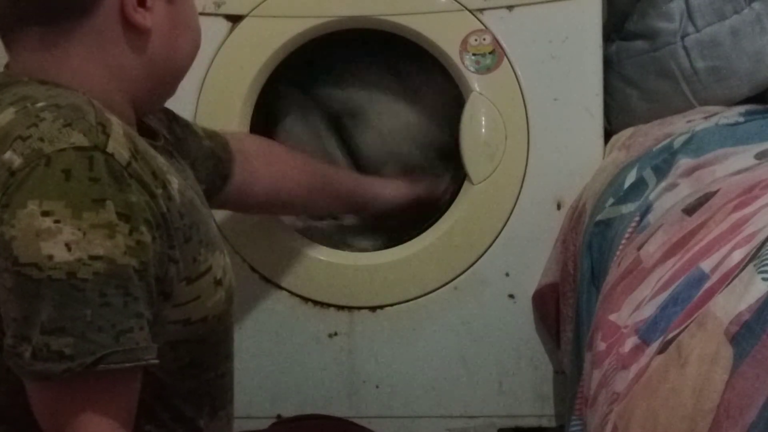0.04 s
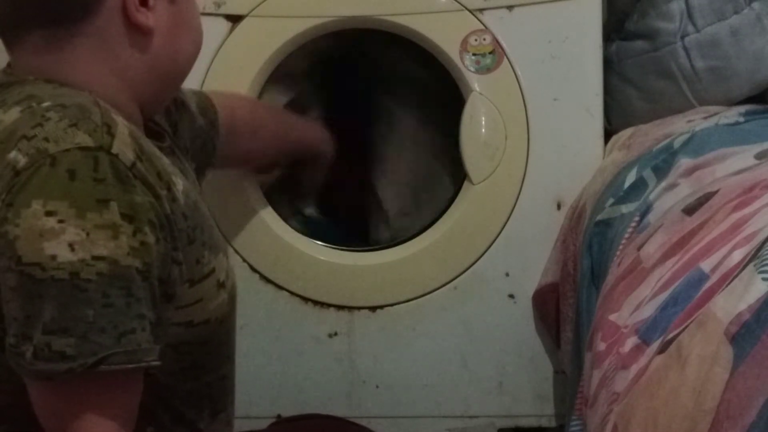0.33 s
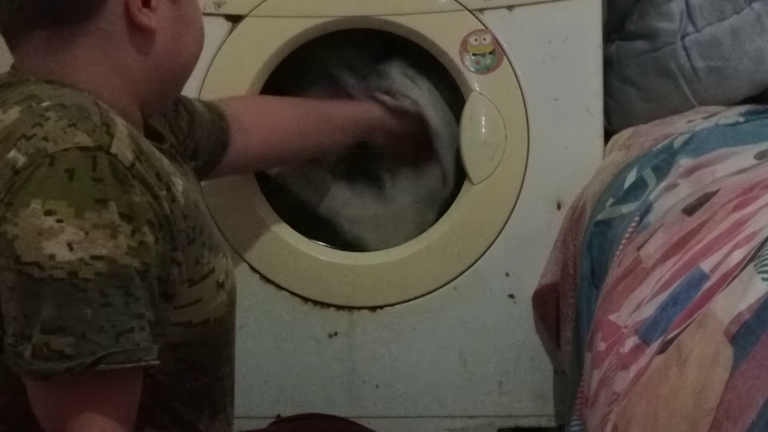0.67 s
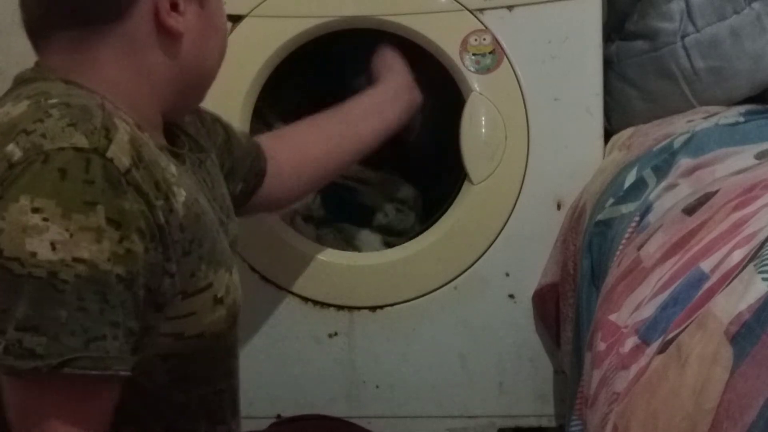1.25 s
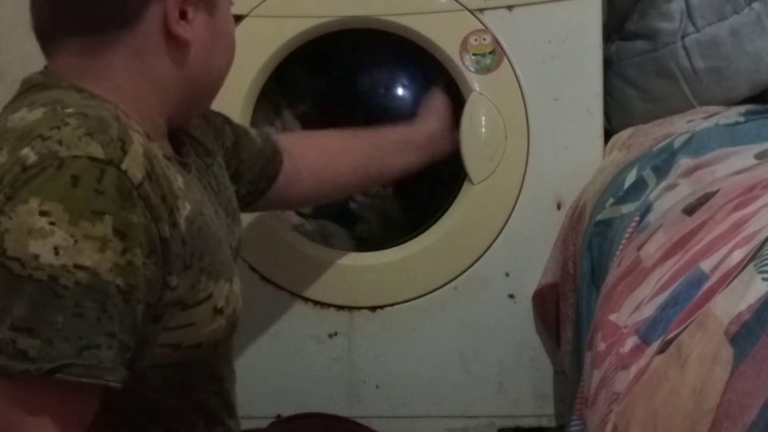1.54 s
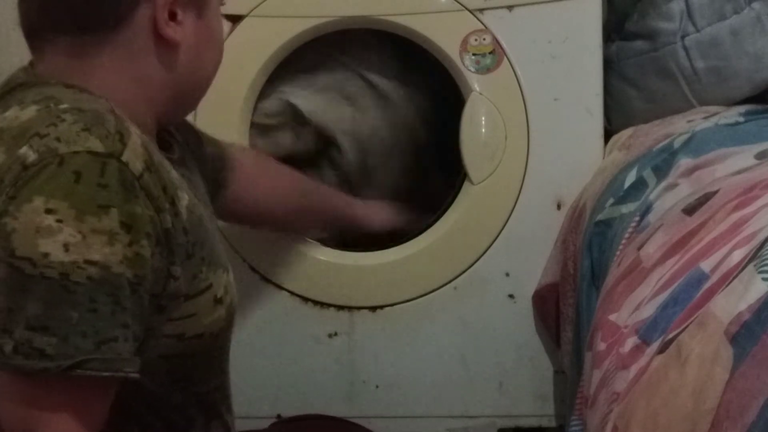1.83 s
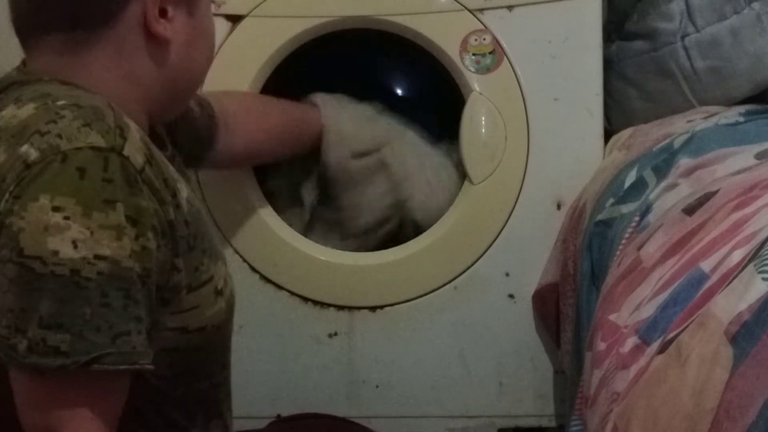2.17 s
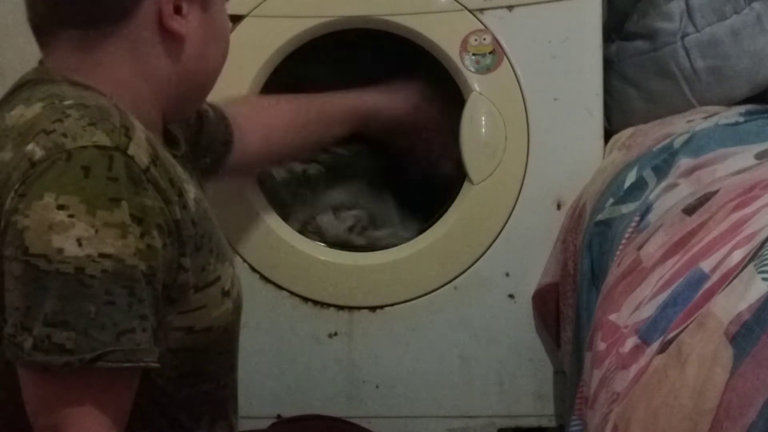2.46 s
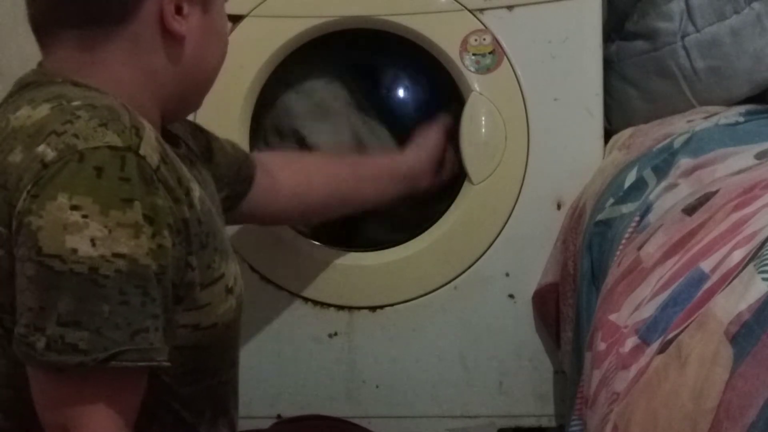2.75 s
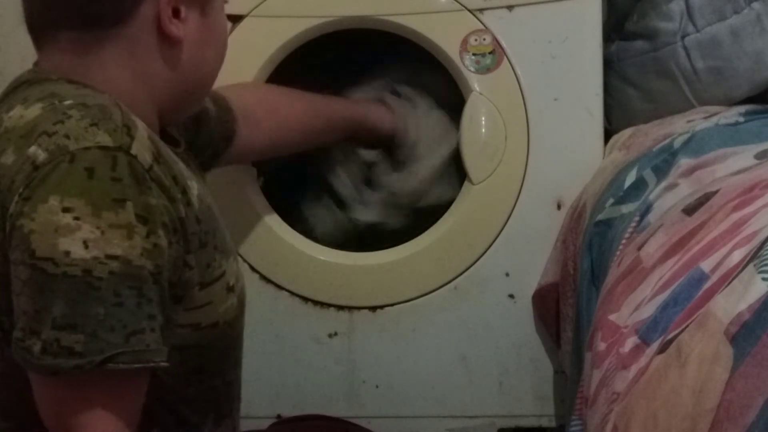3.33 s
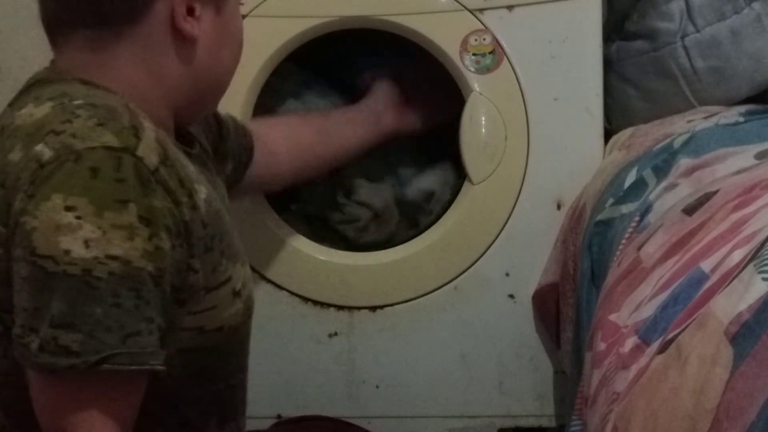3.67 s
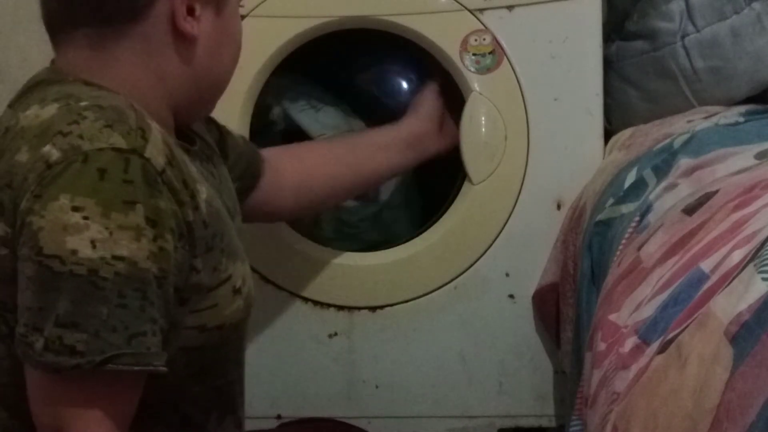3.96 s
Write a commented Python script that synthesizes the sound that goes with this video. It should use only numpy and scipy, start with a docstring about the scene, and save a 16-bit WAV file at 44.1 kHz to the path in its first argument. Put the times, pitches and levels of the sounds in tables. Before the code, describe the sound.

Laundry rustles and thumps as it is turned by hand in a washing machine drum.

```python
"""In a quiet room, an arm turns laundry over in the steel drum of a front-loading washing machine.
The rocking drum rumbles in its tub. Cloth rubs and swishes along the wall in short strokes,
and bundles thump down. The hand knocks the steel, which rings; there are a few bright scrapes
and one short squeak of skin."""
import sys
import numpy as np
from scipy import signal
from scipy.fft import rfft, irfft, next_fast_len
from scipy.io import wavfile
from scipy.ndimage import uniform_filter1d, map_coordinates

SR = 44100
rng = np.random.default_rng(int(sys.argv[2]) if len(sys.argv) > 2 else 0)


def store_wav(level_fs):
    """Save 16-bit WAV to argv[1]."""
    pcm = np.round(np.clip(np.atleast_2d(level_fs), -1, 1) * 32767)
    wavfile.write(sys.argv[1], SR, pcm.T.astype(np.int16))


N = 176400


def amp(db):
    return 10 ** (np.asarray(db) / 20)

def unit(x):
    return x / np.sqrt(np.mean(x ** 2) + 1e-20)

def along(points, hz):
    """Interpolate (freq_hz, value) points on a log axis."""
    freqs, values = np.transpose(points)
    return np.interp(np.log(hz + 1), np.log(freqs + 1), values)

def level(points):
    """Gain per sample from (time_s, level_db) points."""
    return amp(np.interp(np.arange(N) / SR, *np.transpose(points)))

def wobble(per_s):
    """Smooth random curve, per_s knots a second."""
    return map_coordinates(rng.standard_normal(4096), [np.arange(N) * per_s / SR], mode="wrap")

def coloured(x, spectrum):
    """x shaped by a spectrum; rms 1."""
    return unit(irfft(rfft(x) * amp(along(spectrum, np.fft.rfftfreq(N, 1 / SR))), N))

def grains(per_s):
    """Random impulses; rms 1."""
    return unit((rng.random(N) < per_s / SR) * rng.standard_normal(N))

def lowpass(x, hz, order=2):
    return signal.sosfilt(signal.butter(order, hz, fs=SR, output="sos"), x)

def through(x, response):
    return signal.fftconvolve(x, response)[:N]

def steadied(x, samples):
    """x divided by its running rms."""
    return x / np.sqrt(np.abs(uniform_filter1d(x ** 2, samples)) + 1e-12)

def add(track, start_s, sound):
    part = track[max(round(start_s * SR), 0):][:len(sound)]
    part += sound[:len(part)]

def ring(modes, phase_rad=0):
    """Impulse response of damped modes, alternating in sign; energy 1."""
    t = np.arange(SR // 2) / SR
    hz, db, t60_s = np.transpose(modes)[..., None]
    partials = amp(db - 60 * t / t60_s) * np.sin(2 * np.pi * hz * t + phase_rad)
    response = (-1) ** np.arange(len(hz)) @ partials
    return response / np.linalg.norm(response)

def strike(modes, contact_s, scatter):
    """A push and a short scuffle ring the modes; rms 1 over the first 40 ms."""
    t = np.arange(SR // 8) / SR
    scuffle = rng.standard_normal(len(t)) * np.exp(-t / contact_s)
    force = scatter * scuffle / np.linalg.norm(scuffle) + (t == 0)
    blow = signal.fftconvolve(force, ring(modes))
    return blow / np.std(blow[:SR // 25])


def rolling(modes, wander_db=6, drift_rad=0.96):
    """The rolling load favours one note, then another; its bumps upset their phases."""
    t = np.arange(N) / SR
    notes = np.zeros(N)
    for hz, db, _ in modes:
        gain = amp(db + wander_db * wobble(per_s=13))
        phase = rng.uniform(0, 2 * np.pi) + drift_rad * wobble(per_s=45)
        notes += gain * np.sin(2 * np.pi * hz * t + phase)
    return notes

# hollow drum resonances: pitch_hz, gain_db, t60_s
DRUM_MODES = [(193.4, 2, 0.19), (214.6, 0.5, 0.28), (238.8, 4.5, 0.19), (246.9, 2.5, 0.19),
              (286.2, -2.5, 0.14), (304.7, -3.5, 0.42), (354, -7, 0.14), (401.8, -11, 0.13),
              (435, -17, 0.3), (445.8, -10, 0.6), (479.2, -15, 0.42)]
# envelope of the deep drum modes: time_s, level_db
DEEP_ENVELOPE = [(0.0, -47), (0.03, -41), (0.19, -50), (0.39, -34), (0.48, -38), (0.54, -50), (0.63, -44.5),
                 (0.68, -36.5), (0.79, -48.5), (0.96, -47.5), (1.07, -40.5), (1.22, -46), (1.29, -54),
                 (1.34, -49), (1.56, -56), (1.64, -70.5), (1.7, -79), (1.74, -52.5), (1.93, -43.5),
                 (2.06, -36), (2.14, -49), (2.18, -37), (2.4, -45), (2.58, -42), (2.65, -48.5),
                 (2.89, -53.5), (2.99, -42.5), (3.17, -44.5), (3.4, -37), (3.58, -51), (3.66, -51),
                 (3.73, -67), (3.81, -49), (3.9, -66), (3.93, -41.5), (4.0, -55)]
# envelope of the upper drum modes: time_s, level_db
UPPER_ENVELOPE = [(0.0, -57.5), (0.51, -43), (0.97, -63), (1.07, -45), (1.67, -86.5), (1.9, -49),
                  (2.55, -50.5), (2.75, -66.5), (3.36, -43), (3.74, -78), (4.0, -54.5)]

def drum_rumble(split_hz=270, surge_db=1.85):
    """The load keeps the rocking drum's hollow modes sounding."""
    deep = steadied(rolling([m for m in DRUM_MODES if m[0] < split_hz]), samples=1500)
    upper = steadied(rolling([m for m in DRUM_MODES if m[0] >= split_hz]), samples=1800)
    drum = level(DEEP_ENVELOPE) * amp(-3.5) * deep + level(UPPER_ENVELOPE) * amp(-2) * upper
    return drum * amp(surge_db * wobble(per_s=30))


# bass tub resonances: pitch_hz, gain_db, t60_s
TUB_MODES = [(82, -4.5, 0.17), (93, -9.5, 0.74), (117.1, 0.5, 0.41), (133.6, 5, 0.28), (144.3, -2, 0.41),
             (155.8, 2, 0.088)]
# broad rumble spectrum: freq_hz, gain_db
RUMBLE_SPECTRUM = [(20, -13.5), (45, -17.5), (70, -5.5), (130, -7), (170, -13), (240, -6.5), (330, -18.5),
                   (420, -25), (550, -28), (1000, -38), (3000, -58)]
# envelope of the tub's sway: time_s, level_db
SWAY_ENVELOPE = [(0.0, -48.5), (0.3, -47), (0.48, -49), (0.6, -49), (0.78, -43), (0.87, -65), (0.91, -49),
                 (0.97, -58), (1.05, -38), (1.25, -57), (1.32, -47.5), (1.4, -54), (1.46, -78), (1.52, -60),
                 (1.67, -74), (1.73, -53.5), (1.88, -47.5), (2.3, -50), (2.38, -49.5), (2.45, -62),
                 (2.53, -48), (2.64, -67), (2.71, -47.5), (3.05, -53), (3.11, -46), (3.46, -47.5),
                 (3.61, -63), (3.76, -69), (3.91, -59), (4.0, -68)]

def tub_sway():
    """Small bumps of the load ring the swaying tub over a broad rumble."""
    bumps = grains(per_s=45) + 0.18 * rng.standard_normal(N)
    bass = steadied(through(bumps, ring(TUB_MODES)), samples=3000)
    broad = coloured(rng.standard_normal(N), RUMBLE_SPECTRUM)
    return level(SWAY_ENVELOPE) * (amp(-4.5) * bass + amp(-8) * broad)


# noise floor spectrum: freq_hz, gain_db
ROOM_SPECTRUM = [(20, 21), (100, 9), (240, 13), (340, 2.5), (500, 5.5), (1000, -1), (2500, -4.5),
                 (6000, -6), (8000, -12.5), (11000, -15), (13700, -22), (14500, -10), (15200, 4),
                 (15800, -3)]

def room_tone(level_db=-70.5):
    """Steady room noise and faint hiss."""
    return amp(level_db) * coloured(rng.standard_normal(N), ROOM_SPECTRUM)


def wall_response(t60_s=0.061):
    """The wall's dense high modes from one contact point; energy 1."""
    t = np.arange(SR // 7) / SR
    response = rng.standard_normal(len(t)) * amp(-60 * t / t60_s)
    return response / np.linalg.norm(response)

def folds(x, depth_db):
    """Shifting folds favour one narrow band, then another."""
    bands = signal.stft(x, nperseg=512)[2]
    field = uniform_filter1d(rng.standard_normal(bands.shape), size=3, axis=0)
    field = uniform_filter1d(field, size=9, axis=1)
    return signal.istft(bands * unit(amp(depth_db * unit(field))), nperseg=512)[1][:N]

# steel wall resonances: pitch_hz, gain_db, t60_s
STEEL_MODES = [(571, -4.5, 0.16), (644, 1.5, 0.23), (671, -3, 0.36), (719.5, -0.5, 0.42),
               (766.4, 0.5, 0.11), (806.5, 0, 0.22), (853, 1, 0.34), (906, -5, 0.21), (1023, -6.5, 0.23),
               (1098, -16.5, 0.3), (1294, -17, 0.2), (1352, -2, 0.21), (1630, -8.5, 0.24), (1743, -9, 0.14),
               (2044, -10, 0.41)]
# low cloth friction: freq_hz, gain_db
SCUFF_SPECTRUM = [(150, -32), (470, -0.5), (800, 3), (1200, -0.5), (1800, -5.5), (2400, -13), (5000, -31),
                  (12000, -45)]
# mid cloth friction: freq_hz, gain_db
RUB_SPECTRUM = [(500, -35), (1200, 1.5), (2000, 4), (3300, 3), (4200, -6), (5000, -10.5), (6500, -32),
                (12000, -39)]
# high cloth friction: freq_hz, gain_db
SWISH_SPECTRUM = [(1500, -16), (3500, -0.5), (5000, 6), (5900, 9.5), (7000, 2), (8200, -0.5), (9800, 2.5),
                  (10800, -10), (11700, -14), (13000, -28), (16000, -1.5)]
# cloth strokes: start_s, rise_s, hold_s, release_t60_s, steel_db, scuff_db, rub_db, swish_db
CLOTH_STROKES = [ (0.058, 0.02, 0.044, 0.16, -60, -57, -68.5, -74.5),
                 (0.137, 0.011, 0.025, 0.38, -67, -82, -85, -74.5),
                 (0.212, 0.14, 0.084, 0.32, -55.5, -67, -78.5, -80),
                 (0.458, 0.019, 0.047, 0.12, -48, -47, -57.5, -62.5),
                 (0.533, 0.0065, 0.076, 0.16, -56, -50.5, -59.5, -60.5),
                 (0.608, 0.005, 0.051, 0.28, -51, -64, -76, -83),
                 (1.018, 0.076, 0.032, 0.33, -47, -58, -72, -63),
                 (1.243, 0.057, 0.095, 0.15, -85, -68, -75.5, -81),
                 (1.356, 0.011, 0.034, 0.29, -45.5, -47, -54, -57.5),
                 (1.485, 0.0067, 0.0067, 0.37, -57.5, -63, -77, -70.5),
                 (1.706, 0.0068, 0.038, 0.18, -68.5, -62, -63, -81),
                 (1.968, 0.024, 0.046, 0.49, -47.5, -49.5, -60.5, -62.5),
                 (2.056, 0.014, 0.032, 0.25, -58, -57, -53.5, -57),
                 (2.176, 0.05, 0.018, 0.15, -56.5, -51.5, -63, -73.5),
                 (2.252, 0.014, 0.052, 0.35, -58.5, -62.5, -72.5, -73),
                 (2.349, 0.0036, 0.0096, 0.16, -61, -67, -76, -82),
                 (2.435, 0.008, 0.038, 0.3, -65, -59, -74, -86),
                 (2.554, 0.093, 0.024, 0.22, -59.5, -62.5, -69, -61.5),
                 (2.706, 0.027, 0.089, 0.14, -62, -62, -65.5, -66.5),
                 (2.839, 0.0036, 0.024, 0.29, -53.5, -51.5, -52, -59.5),
                 (2.996, 0.014, 0.014, 0.45, -60, -60, -66, -82),
                 (3.078, 0.017, 0.048, 0.32, -49.5, -45.5, -54.5, -59.5),
                 (3.211, 0.0069, 0.041, 0.22, -47, -47.5, -50, -54),
                 (3.3, 0.0059, 0.12, 0.2, -57, -61.5, -72.5, -92),
                 (3.418, 0.019, 0.098, 0.21, -68, -62, -68.5, -84),
                 (3.907, 0.0046, 0.02, 0.27, -68.5, -70, -77.5, -81.5)]

def cloth_strokes(flutter_db=0.66, spread_db=5.5, ring_cutoff_hz=1027):
    """Grainy friction scuffs, rubs and swishes, ringing the low steel modes differently at each spot."""
    textures = np.zeros((3, N))
    for i, (trim_db, spectrum) in enumerate([(-1, SCUFF_SPECTRUM), (0, RUB_SPECTRUM), (0, SWISH_SPECTRUM)
                                             ]):
        friction = rng.standard_normal(N) + amp(-2) * grains(per_s=900)  # the weave catches
        textures[i] = amp(trim_db) * coloured(friction, spectrum)
    textures *= amp(flutter_db * wobble(per_s=60))
    steel, rustle, shimmer = np.zeros((3, N))
    for start_s, rise_s, hold_s, t60_s, steel_db, *textures_db in CLOTH_STROKES:
        texture = amp(textures_db) @ textures[:, round(start_s * SR):][:, :SR // 2]
        t = np.arange(len(texture)) / SR
        release = amp(-60 * np.maximum(t - rise_s - hold_s, 0) / t60_s)
        envelope = np.minimum(t / rise_s, 1) * release
        add(rustle, start_s, envelope * texture)
        add(shimmer, start_s, through(envelope * texture, wall_response()))
        modes = [(hz, db + spread_db * rng.standard_normal(), t60) for hz, db, t60 in STEEL_MODES]
        force = amp(steel_db) * envelope * rng.standard_normal(len(t))
        add(steel, start_s, through(force, ring(modes)))
    cloth = folds(amp(-3.5) * rustle + amp(-2) * shimmer, depth_db=3)
    return lowpass(steel, ring_cutoff_hz) + cloth


# reflection decay: freq_hz, t60_s
CAVITY_DECAY = [(200, 0.1), (1000, 0.36), (3000, 0.28), (6000, 0.067), (12000, 0.43)]

def cavity(x, wet_db):
    """Dense reflections in the drum and the small room."""
    hz, t, bands = signal.stft(rng.standard_normal(SR // 2), SR, nperseg=256)
    decay = amp(-60 * t / along(CAVITY_DECAY, hz)[:, None])
    tail = signal.istft(bands * decay, SR, nperseg=256)[1]
    wet = through(x, tail / np.linalg.norm(tail))
    return (x + amp(wet_db) * wet) / np.hypot(1, amp(wet_db))

# dull slap spectrum: freq_hz, gain_db
SLAP_SPECTRUM = [(60, -58), (200, -47), (450, 2.5), (800, 5), (1600, -17.5), (2300, -6), (5000, -49),
                 (10000, -62)]
# soft blows of cloth and hand: start_s, tub_db, drum_db, centre_hz, steel_db
BLOWS = [(0.363, -44, -37.5, 243, -71), (0.425, -38, -41, 239, -57), (.452, -47, -31, 311, -43.5),
         (.657, -63, -34, 235, -54), (1.024, -55, -47, 406, -39.5), (1.043, -38, -49, 222, -41),
         (1.137, -36.5, -44.5, 223, -70), (1.243, -43.5, -49, 195, -80), (1.332, -45, -52, 195, -46),
         (1.39, -43.5, -63, 200, -64), (1.501, -45.5, -61, 198, -90), (1.804, -54, -48, 236, -66),
         (1.895, -52, -47, 346, -65), (2.031, -39, -40, 211, -58), (2.173, -55, -33.5, 288, -51),
         (2.222, -49, -38, 231, -44), (2.357, -56, -37, 247, -60), (2.504, -46, -36.5, 238, -82),
         (2.602, -67, -60, 239, -56), (2.939, -55, -41, 240, -56), (3.087, -72, -55, 302, -40),
         (3.358, -53, -38.5, 241, -68), (3.401, -43, -36, 273, -70), (3.917, -76, -54, 250, -70)]

def thumps(focus_db_per_oct=20.5, slap_decay_s=0.014, steel_cutoff_hz=960):
    """Each soft blow slaps and shakes the tub, the steel and the drum modes near its centre_hz."""
    body, steel, slap_envelope = np.zeros((3, N))
    t = np.arange(SR // 4) / SR
    for start_s, tub_db, drum_db, centre_hz, steel_db in BLOWS:
        favoured = [(hz, db - focus_db_per_oct * abs(np.log2(hz / centre_hz)), t60)
                    for hz, db, t60 in DRUM_MODES]
        add(body, start_s, amp(tub_db - 6) * strike(TUB_MODES, contact_s=0.02, scatter=0.51))
        add(body, start_s, amp(drum_db - 7) * strike(favoured, contact_s=0.015, scatter=0.16))
        add(steel, start_s, amp(steel_db - 6) * strike(STEEL_MODES, contact_s=0.0067, scatter=0.59))
        add(slap_envelope, start_s, amp(steel_db - 6) * np.exp(-t / slap_decay_s))
    slap = lowpass(slap_envelope * coloured(rng.standard_normal(N), SLAP_SPECTRUM), hz=1800, order=6)
    return body + lowpass(steel, steel_cutoff_hz) + cavity(slap, wet_db=6.5)


# knuckles on steel: start_s, level_db, cutoff_hz
HAND_KNOCKS = [(1.034, -40.5, 780), (1.368, -42, 2250), (1.405, -41, 1300), (2.052, -47, 560),
               (3.096, -46.5, 900)]

def knocks(rise_s=0.0096):
    """Knuckles ring the steel modes out of phase; softer contact lowers the cutoff."""
    track = np.zeros(N)
    swell = 1 - np.exp(-np.arange(SR // 2) / SR / rise_s)
    for start_s, level_db, cutoff_hz in HAND_KNOCKS:
        phases = rng.uniform(0, 2 * np.pi, (len(STEEL_MODES), 1))
        knock = lowpass(swell * ring(STEEL_MODES, phases), cutoff_hz)
        add(track, start_s, amp(level_db) * knock / np.std(knock[:SR // 25]))
    return track


# bright wall resonances: pitch_hz, gain_db, t60_s
ZING_MODES = [(5510, 10, 0.029), (5960, 7, 0.046), (5770, 3.5, 0.19), (6260, -23, 0.12), (10200, -9, .08)]
# scratch spectrum: freq_hz, gain_db
SCRATCH_SPECTRUM = [(1000, -45), (4000, -16), (5700, 4.5), (7000, -5.5), (11500, -5), (13500, -23),
                    (15500, -13)]
# scrapes on steel: start_s, level_db
STEEL_SCRAPES = [(1.357, -51), (1.376, -49), (1.409, -73), (2.066, -58), (2.845, -59), (3.215, -57.5)]

def scrapes(decay_s=0.024):
    """Brief scratches, perhaps of fingernails or a button, ring the wall brightly."""
    zing, envelope = np.zeros((2, N))
    t = np.arange(SR // 10) / SR
    for start_s, level_db in STEEL_SCRAPES:
        add(zing, start_s, amp(level_db - 8) * strike(ZING_MODES, contact_s=0.0078, scatter=1))
        add(envelope, start_s, amp(level_db - 1) * np.exp(-t / decay_s))
    return zing + envelope * coloured(rng.standard_normal(N), SCRATCH_SPECTRUM)


# skin on steel: start_s, pitch_hz, length_s, level_db
SKIN_SQUEAKS = [(1.704, 4720, 0.028, -63)]

def squeak(jitter=0.0072):
    """Skin rubs the steel: a short, unsteady high tone."""
    track = np.zeros(N)
    for start_s, pitch_hz, length_s, level_db in SKIN_SQUEAKS:
        n = int(length_s * SR)
        hz = pitch_hz * (1 + jitter * wobble(per_s=330)[:n])
        add(track, start_s, amp(level_db) * np.hanning(n) * np.sin(2 * np.pi * np.cumsum(hz) / SR))
    return track


def scene():
    """Mono mix in front of the open door."""
    bed = drum_rumble() + tub_sway() + room_tone()
    return (bed + cloth_strokes() + thumps() + knocks() + scrapes() + squeak())[None]

def record(dry):
    """Deep bass rolled off, top band-limited."""
    low_cut_hz, top_hz = 63, 15800
    size = next_fast_len(N + SR // 2)
    hz = np.fft.rfftfreq(size, 1 / SR)
    response = (hz < top_hz) * hz ** 2 / np.hypot(hz ** 2, low_cut_hz ** 2)
    return irfft(rfft(dry, size) * response, size)[..., :N]


dry = scene()
out = record(dry)
store_wav(out)
```